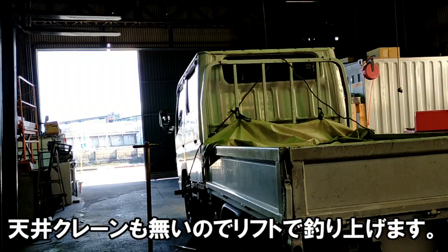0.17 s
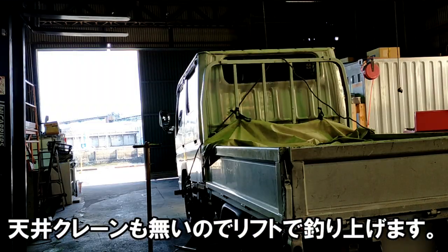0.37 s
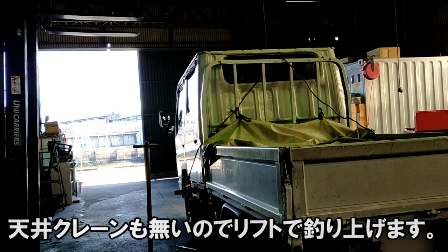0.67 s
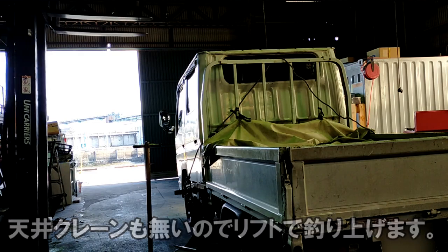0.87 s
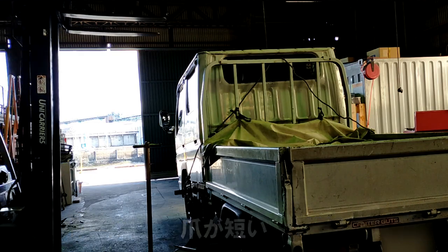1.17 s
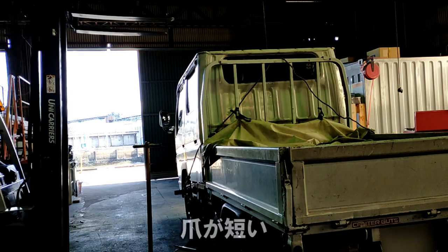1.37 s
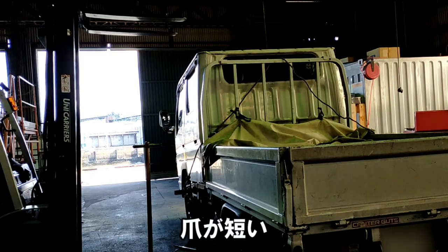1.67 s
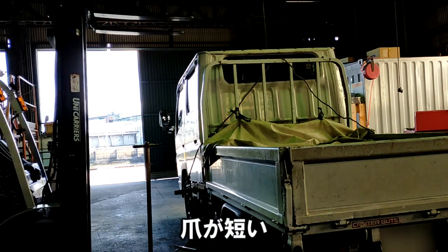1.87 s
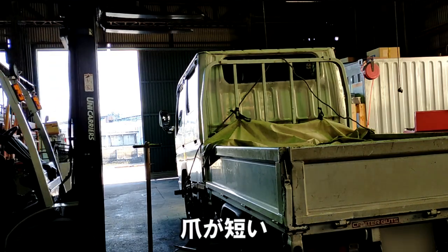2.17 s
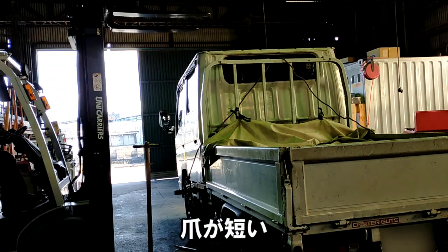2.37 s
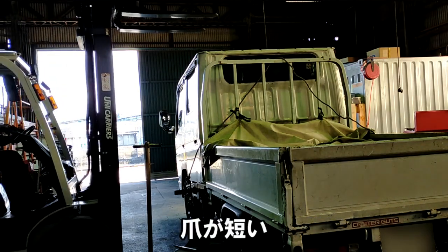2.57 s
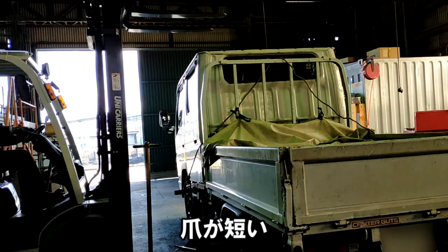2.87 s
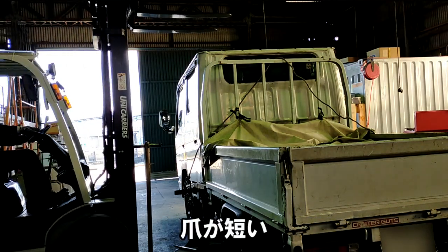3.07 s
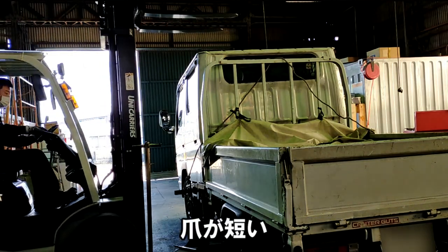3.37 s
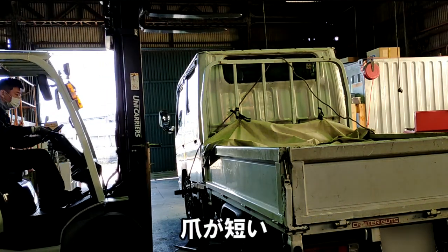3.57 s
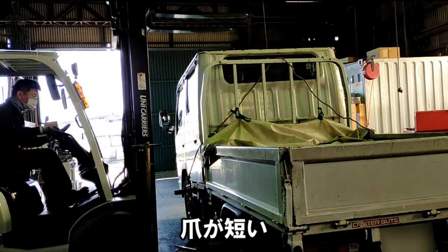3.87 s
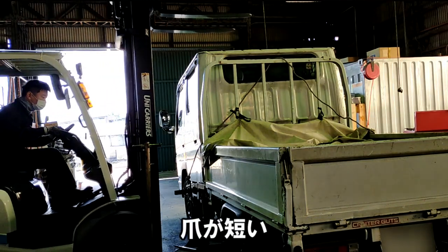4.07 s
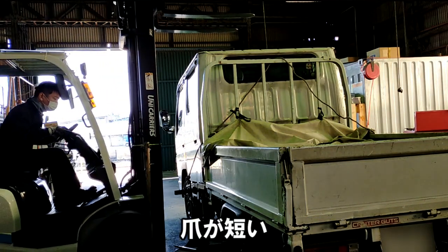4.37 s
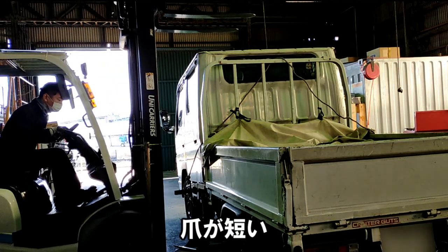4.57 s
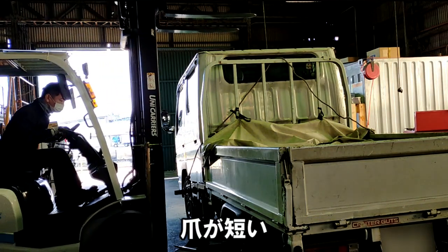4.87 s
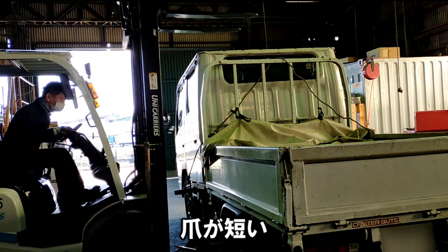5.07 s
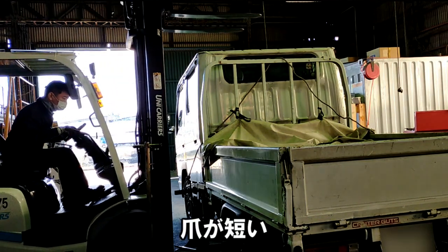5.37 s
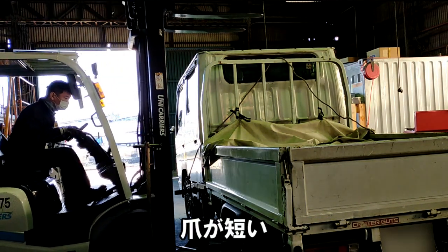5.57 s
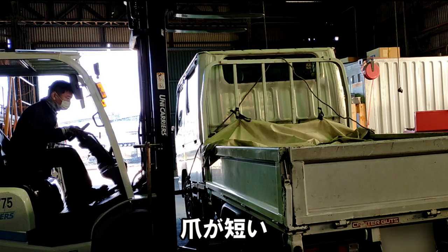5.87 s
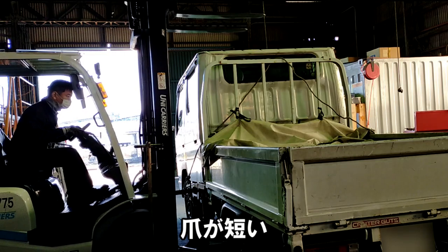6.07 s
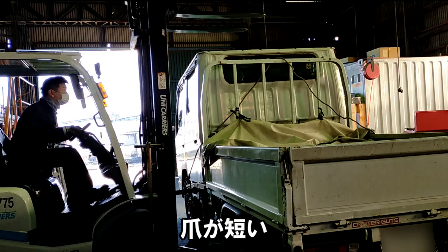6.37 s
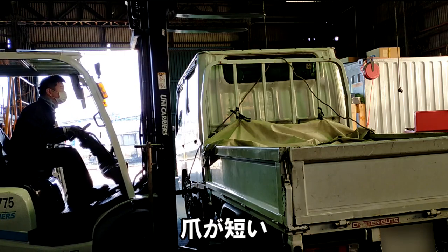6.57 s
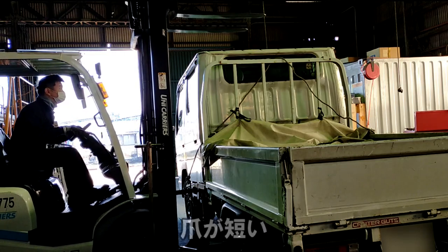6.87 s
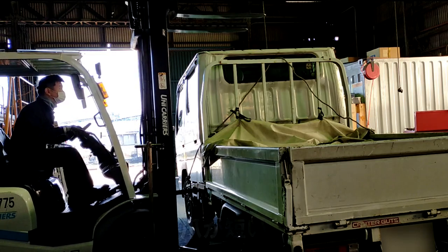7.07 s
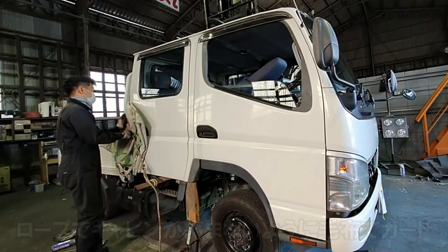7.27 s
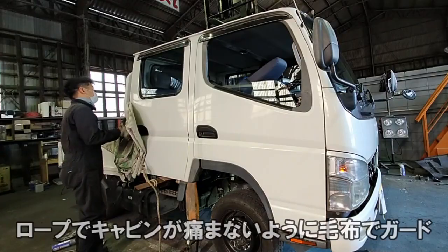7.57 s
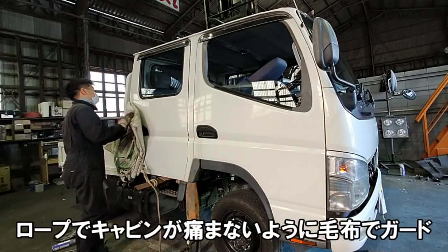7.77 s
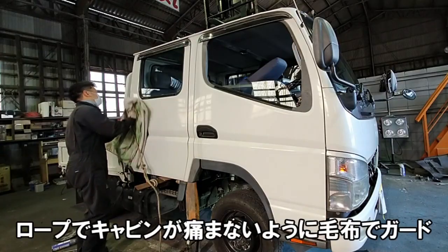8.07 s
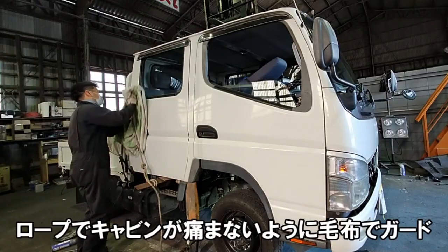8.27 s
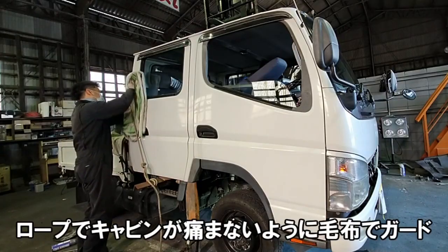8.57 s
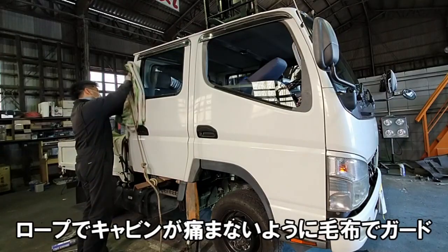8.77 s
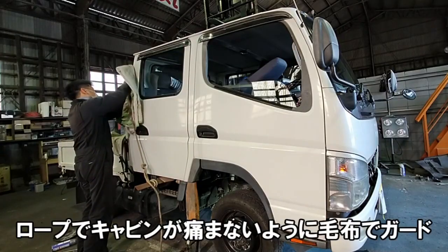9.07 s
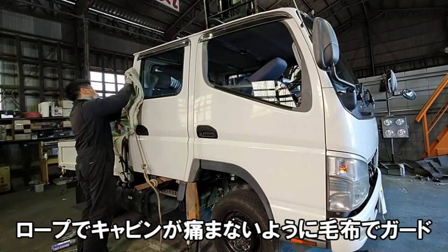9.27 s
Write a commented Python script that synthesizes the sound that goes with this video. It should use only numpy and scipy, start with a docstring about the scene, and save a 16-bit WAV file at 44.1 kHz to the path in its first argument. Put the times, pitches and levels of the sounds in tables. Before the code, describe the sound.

Steady rattling forklift idle draws nearer in a metal shed, mast and forks bang and rattle midway, then an abrupt shift to a low drone.

```python
"""An engine idles: the exhaust throbs, the block clatters, belt, fan and pump whistle and hum.
It is a forklift creeping into a steel workshop, made of crank-locked tones, filtered blows and gated noise.
Once the mast and forks knock hard, as noise bursts ringing steel, and rattle themselves out in the hall.
Late on the listening place jumps deeper into the hall: the idle is duller and a low drone stands out."""
import sys
import numpy as np
from scipy import signal
from scipy.fft import rfft, irfft, next_fast_len
from scipy.io import wavfile
from scipy.ndimage import uniform_filter1d

SR = 44100
rng = np.random.default_rng(int(sys.argv[2]) if len(sys.argv) > 2 else 0)


def master(y):
    """Save y as 16-bit WAV."""
    cut = np.clip(np.atleast_2d(y).T, -1, 1)
    pcm = np.round(cut * 32767)  # scale
    wavfile.write(sys.argv[1], SR, pcm.astype(np.int16))


N = 415551
T = np.arange(N) / SR


def undb(db):
    """Decibels to gain."""
    return 10 ** (np.asarray(db) / 20)


def level(x, db):
    """Scale to unit rms, then apply a fixed or time-varying level in dB."""
    return x * undb(db) / np.sqrt(np.mean(x ** 2))


def noise():
    """White noise."""
    return rng.standard_normal(N)


def walk(rate_hz):
    """Smooth random drift of unit rms, changing about rate_hz times a second."""
    size = int(SR / rate_hz)
    once = uniform_filter1d(noise(), size, mode="wrap")
    return level(uniform_filter1d(once, size, mode="wrap"), 0)


def swell(middle_s, length_s):
    """Smooth rise and fall, 0 to 1 to 0."""
    return np.cos(np.pi * np.clip((T - middle_s) / length_s, -.5, .5)) ** 2


def swells(rows):
    """Level change in dB over time from rows of middle_s, length_s, peak_db."""
    return sum(db * swell(middle_s, length_s) for middle_s, length_s, db in rows)


def colour(x, points):
    """Minimum-phase filter through hz, gain_db points, built from the folded cepstrum."""
    hz, db = np.transpose(points)
    size = 2 * next_fast_len(N)
    f = np.arange(size // 2 + 1) * SR / size
    gain_db = np.interp(np.log(f + 1), np.log(hz), db)
    cepstrum = irfft(np.log(undb(gain_db)))
    cepstrum[1:size // 2] *= 2
    cepstrum[size // 2 + 1:] = 0
    response = np.exp(rfft(cepstrum))
    return irfft(rfft(x, size) * response)[:N]


def ring(x, modes):
    """Parallel resonances from rows of hz, width_hz, gain_db."""
    out = np.zeros(N)
    for hz, width_hz, db in modes:
        b, a = signal.iirpeak(hz, hz / width_hz, fs=SR)
        out += undb(db) * signal.lfilter(b, a, x)
    return out


def tail(t60_s):
    """Dense dying reflections: decaying noise of unit energy, two seconds long."""
    t = T[:2 * SR]
    h = rng.standard_normal(len(t)) * undb(-60 * t / t60_s)
    return h / np.sqrt(np.sum(h ** 2))


def hall(x, wet_db):
    """Direct sound plus the reverberation of the steel shed."""
    return x + undb(wet_db) * signal.fftconvolve(x, tail(t60_s=0.92))[:N]


def rumble():
    """Low murmur of air and sheet walls: noise centred near 60 Hz."""
    spectrum = [(10, -26.5), (25, -4), (60, 3.5), (110, -3.0), (200, -17.0), (600, -68)]
    return level(colour(noise(), spectrum), -41.5)


def squeaks():
    """Dry steel rubs briefly and hisses in one broad resonance."""
    # dry rubs of the mast: middle_s, length_s, centre_hz, peak_db
    rubs = [(1.428, 0.07, 2180, -45), (6.282, 0.26, 2236, -41), (7.17, 0.085, 2064, -42)]
    out = np.zeros(N)
    for middle_s, length_s, hz, db in rubs:
        resonance = [(hz, 450, 0)]
        rub = ring(ring(noise(), resonance), resonance)
        out += swell(middle_s, length_s) * level(rub, db)
    return out


def knocks():
    """The mast slams in its rails and the forks rebound: short crunches ring the steel, then the hall."""
    # mast and fork blows: start_s, relative thud_db, relative clank_db, rebounding_s
    blows = [(2.117, -14.5, -14, 0), (2.365, -14.5, -14, 0), (2.500, 0, 0, .047), (2.684, -7.5, -7, 0),
             (2.779, -8, -7, .016), (2.826, -11.5, -8, 0), (2.970, -14.5, -8.5, .016), (3.063, -12, -5, 0),
             (3.345, -11.5, -10.5, 0)]
    # dull body of the mast: hz, gain_db
    mast = [(90, -7), (165, -3), (240, -3), (450, 1), (620, 1.5), (800, 0), (1050, -4), (1350, -18),
            (2500, -36.5), (8000, -35)]
    # ringing of the forks: hz, width_hz, gain_db
    forks = [(564.1, 15, 9.5), (650, 56, -3.5), (1010, 78, -13), (1680, 87, 1), (1790, 112, 1.5),
             (1924, 73, -9), (2110, 62, -7), (2450, 16, -21), (4630, 200, -7), (5130, 420, -6)]
    rebound_gap_s, scatter_gaps, rebound_loss_db = .0105, .12, 2
    thud, clank = np.zeros(N), np.zeros(N)
    for start_s, thud_db, clank_db, rebounding_s in blows:
        for k in range(1 + int(rebounding_s / rebound_gap_s)):
            late_gaps = k + scatter_gaps * rng.standard_normal() * (k > 0)
            start = int((start_s + late_gaps * rebound_gap_s) * SR)
            # one sharp blow, then the chatter of loose links
            contact = tail(t60_s=0.13)
            contact[0] += .2
            span = slice(start, start + len(contact))
            thud[span] += undb(thud_db - k * rebound_loss_db) * contact
            clank[span] += undb(clank_db - k * rebound_loss_db) * contact
    steel = undb(17.5) * colour(thud, mast) + undb(12) * ring(clank, forks)
    # far steel loses its top on the way
    distant = colour(steel, [(5600, 3.0), (6600, -3.5), (8000, -9)])
    return hall(distant, wet_db=-2.5)


def belt(db, second_db, waver_db):
    """The fan belt whistles in two rough strands of narrow noise that slowly come and go."""
    # whistle swells: middle_s, length_s, peak_db
    whistle_swells = [(.75, .9, 3.5), (7.37, .2, 7.5), (8.2, .9, 1.5)]
    upper = level(ring(ring(noise(), [(2186, 75, 0)]), [(2194, 250, 0)]), 0)
    lower = level(ring(ring(noise(), [(2000, 58, 0)]), [(2017, 110, 0)]), second_db)
    return undb(db + swells(whistle_swells) + waver_db * walk(rate_hz=3)) * (upper + lower)


def gated(turn, depth, sway_db):
    """Noise that swells at each firing and sways once per four-cylinder cycle."""
    firing = 1 + depth * np.cos(2 * np.pi * turn)
    sway = undb(sway_db * np.cos(np.pi * turn / 2))
    return noise() * firing * sway


def clatter(turn, scatter_db, loose_db):
    """Firings shake the block, each of the four cylinders slightly differently; loose parts rattle on top."""
    blows = np.diff(np.floor(turn), prepend=0) * undb(scatter_db * noise())
    cylinder = np.floor(turn) % 4
    # the hall smears the blows into a steady comb of lines
    shared = tail(t60_s=0.45)
    repeating = np.zeros(N)
    for k in range(4):
        response = (shared + 0.69 * tail(t60_s=0.43))[:SR // 3]
        repeating += signal.oaconvolve(blows * (cylinder == k), response)[:N]
    loose = gated(turn, depth=0.047, sway_db=0.8)
    return level(repeating, 0) + level(loose, loose_db)


def tone(turn, multiple, db, waver_db):
    """A wavering line locked to the crankshaft, lagging as it passes the silencer's low resonance."""
    hz, silencer_hz, width_hz = 26 * multiple, 46, 9  # nominal 26 Hz firing rate
    lag = np.arctan2(width_hz * hz, silencer_hz ** 2 - hz ** 2)
    gain = np.sqrt(2) * undb(db + waver_db * walk(rate_hz=15))
    return gain * np.sin(2 * np.pi * multiple * turn - lag)


def exhaust(turn, near, alongside):
    """Low firing harmonics throb; they ease, then push as the engine picks up."""
    # throb: firing_multiple, doorway_db, near_gain_db, side_gain_db
    orders = [(1, -50, 16, 3), (2, -29, 1.5, -3), (3, -39, 10, 0.6), (4, -58.5, 6.5, 6)]
    # load: middle_s, length_s, peak_db
    load = [(4.6, 1, -3), (5.3, 0.84, 1.5)]
    load_db = swells(load)
    return sum(tone(turn, multiple, door_db + near * near_db + alongside * side_db + load_db, waver_db=0.43)
               for multiple, door_db, near_db, side_db in orders)


def body_lines(turn, alongside):
    """Lines of the engine body, each shifting in level as the flank turns to the listener."""
    # firing_multiple, doorway_db, alongside_db
    orders = [(5.036, -56.5, -52), (5.504, -49.5, -52.5), (6.255, -49, -53), (6.54, -53.5, -48),
              (6.955, -59, -50), (8.85, -50, -54), (11.02, -52, -62.5), (12.7, -52.5, -51.5),
              (16.86, -54.5, -56), (17.85, -55, -53), (18.78, -62, -54.5), (25.98, -58.5, -52),
              (31.36, -57, -62.5), (35, -56, -53.5), (38.04, -60, -54), (44.1, -66, -59.5)]
    return sum(tone(turn, multiple, door_db + alongside * (side_db - door_db), waver_db=2)
               for multiple, door_db, side_db in orders)


def block_near(turn, near, alongside, jolt_db):
    """Block clatter, blending from its front spectrum to its side spectrum."""
    # block from the front, in the doorway: hz, gain_db
    front_spectrum = [(60, -28.5), (95, -15), (140, -6), (190, -7), (230, -8.5), (265, -10), (320, -9.5),
                      (370, -12), (460, -7.5), (600, -12.5), (850, -13.5), (1100, -17.5), (1750, -18.5),
                      (2250, -20.5), (2700, -32.5), (5000, -87.5)]
    # block from the side: hz, gain_db
    side_spectrum = [(60, -26), (95, -8), (165, -6), (205, -10), (265, -12), (320, -10), (365, -14),
                     (460, -6), (520, -11), (600, -8.5), (760, -12.5), (920, -12.5), (1130, -17.5),
                     (1900, -18.5), (2700, -31), (5000, -92)]
    shake = clatter(turn, scatter_db=2.5, loose_db=2)
    front = level(colour(shake, front_spectrum), -0.44)
    side = level(colour(shake, side_spectrum), -0.6)
    return undb(-38.5 + 3.5 * near + jolt_db) * ((1 - alongside) * front + alongside * side)


def covers(turn, alongside):
    """Engine covers ring under noise gated by the firings."""
    # cover resonances: hz, width_hz, gain_db
    modes = [(1254, 19, 0.5), (2760, 23, -3.5), (3770, 19, -5.5)]
    return level(ring(gated(turn, depth=.1, sway_db=-4.0), modes), -56 + 3 * alongside)


def hiss_near(turn, near, jolt_db):
    """Firing-gated hiss, flickering in level and partly lifted by the jolt."""
    # hiss: hz, gain_db
    spectrum = [(1410, -25.5), (2400, -7.5), (2960, -7.5), (3720, -7), (4010, -7), (4750, -2), (5450, -2.5),
                (6350, -15), (7360, -17), (7750, -28), (8110, -25.5), (10500, -60), (17800, -120)]
    db = -42.5 + 3.5 * near + 0.35 * jolt_db + 0.51 * walk(rate_hz=56)
    return level(colour(gated(turn, depth=0.1, sway_db=0.5), spectrum), db)


def fan(turn):
    """Crank-locked fan hum, swelling at times and fading as the forklift creeps on."""
    # hum swells: middle_s, length_s, peak_db
    hum_swells = [(1.05, 0.92, 7), (3.75, 1.1, 4)]
    return tone(turn, 11.73, -47 - 0.51 * T + swells(hum_swells), waver_db=1.3)


def pump(turn, firing_hz, near):
    """Crank-locked pump whine with phase jitter, louder when near and as the engine speeds up."""
    db_per_hz = 3.5
    db = -66 + 15 * near + db_per_hz * (firing_hz - firing_hz.mean())
    return tone(turn + .009 * walk(rate_hz=28), 60.7, db, waver_db=2.0)


def engine_near(turn, firing_hz):
    """All engine sources draw near ever more slowly and turn side on."""
    approach_s, side_on_s, side_on_takes_s = 2.8, 2.03, 1.03  # approach_s: time constant of distance to go
    # chassis shake around the big knock: middle_s, length_s, peak_db
    jolt = [(2.62, 1, 4.8)]
    near = 1 - np.exp(-T / approach_s)
    alongside = np.clip((T - side_on_s) / side_on_takes_s, 0, 1)
    jolt_db = swells(jolt)
    lines = exhaust(turn, near, alongside) + body_lines(turn, alongside)
    rattle = block_near(turn, near, alongside, jolt_db) + covers(turn, alongside)
    whistle = belt(-51, second_db=-2.5 + 2.2 * alongside, waver_db=0.6)
    return lines + rattle + hiss_near(turn, near, jolt_db) + fan(turn) + pump(turn, firing_hz, near) + whistle


def engine_far(turn):
    """Standing waves pick other harmonics, the high ones wavering most, and a low resonance drones."""
    # lines deep in the hall: firing_multiple, level_db
    orders = [(1, -29.5), (2, -37.5), (3, -37.5), (4, -44), (5.5, -41.5), (11, -55), (12.7, -52.5),
              (18, -59), (28, -59), (34, -59.5), (37, -58.5)]
    # block deep in the hall: hz, gain_db
    block_spectrum = [(60, -13.5), (95, -10), (115, -10), (148, -7), (175, -6), (230, -9.5), (310, -11.5),
                      (420, -11), (540, -14), (900, -16), (1400, -21.5), (2170, -20.5), (2600, -43),
                      (5000, -97.5)]
    # hiss deep in the hall: hz, gain_db
    hiss_spectrum = [(1410, -26), (2400, -6), (2730, -9), (3210, -8.5), (3800, -10.5), (4900, -3),
                     (5790, -9), (7070, -21), (8110, -31.5), (10500, -73), (17800, -120)]
    lines = sum(tone(turn, multiple, db, waver_db=.6 * np.log(multiple)) for multiple, db in orders)
    block = level(colour(clatter(turn, scatter_db=1.5, loose_db=2), block_spectrum), -37.5)
    hiss = level(colour(gated(turn, depth=.045, sway_db=0.96), hiss_spectrum), -43.0)
    return lines + block + hiss + belt(-51, second_db=-4.5, waver_db=0.5)


def scene():
    """One idling engine, heard from two places in turn, with knocks, squeaks and rumble."""
    # engine speed, sagging under load and picking up again: time_s, firing_hz
    speed = [(0, 25.96), (.5, 25.68), (2.0, 25.61), (2.5, 25.3), (3.7, 25.76), (4.3, 25.27), (4.75, 25.26),
             (5.05, 26.18), (5.6, 25.7), (8.3, 26.18)]
    move_s, move_takes_s = 7.335, 0.018
    firing_hz = np.interp(T, *np.transpose(speed))
    turn = np.cumsum(firing_hz) / SR + .5 + .004 * walk(rate_hz=13)  # counted in firings
    moved = np.clip((T - move_s) / move_takes_s + .5, 0, 1)
    engine = np.sqrt(1 - moved) * engine_near(turn, firing_hz) + np.sqrt(moved) * engine_far(turn)
    return (rumble() + squeaks() + knocks() + engine)[None]


def record(dry):
    """The recorder cuts the top steeply: elliptic low-pass at 7900 Hz."""
    top_hz, ripple_db, stop_db = 7900, .2, 75
    return signal.sosfilt(signal.ellip(10, ripple_db, stop_db, top_hz, fs=SR, output="sos"), dry)


dry = scene()
out = record(dry)
master(out)
```